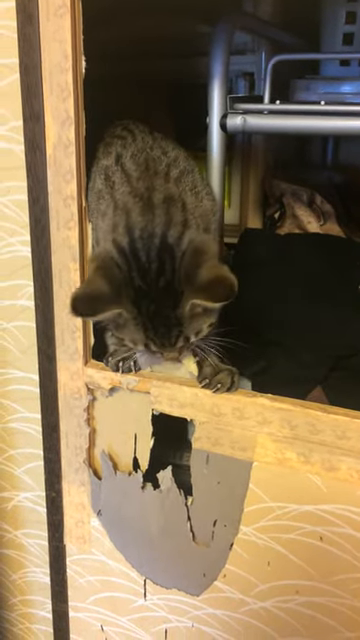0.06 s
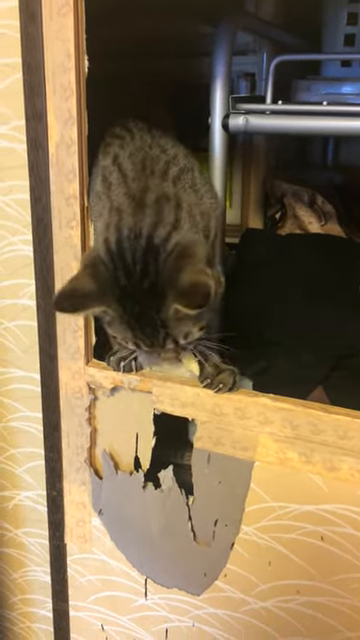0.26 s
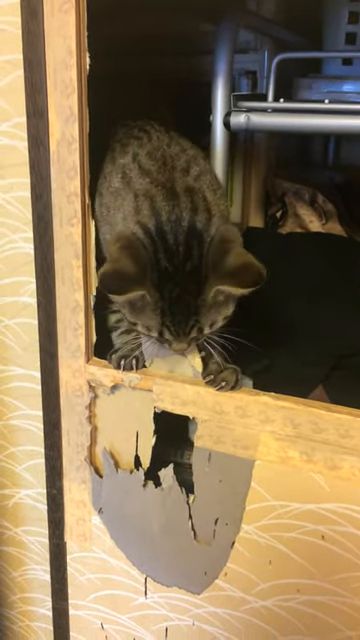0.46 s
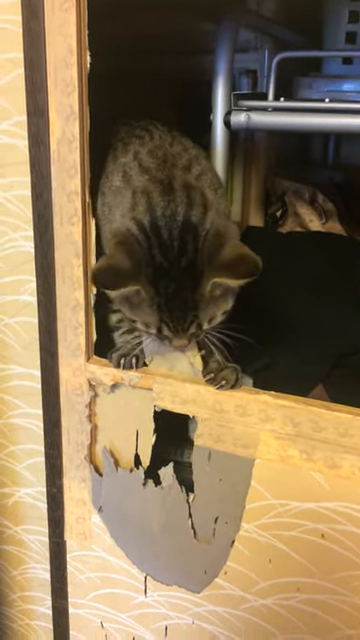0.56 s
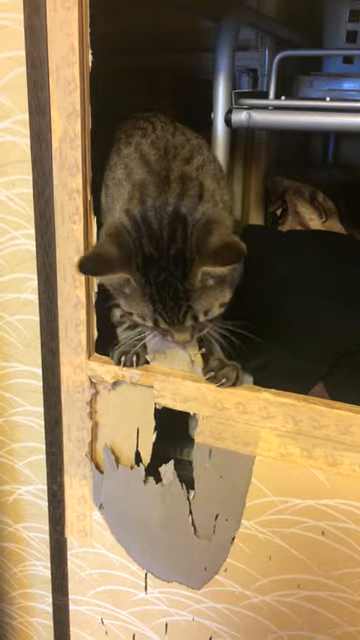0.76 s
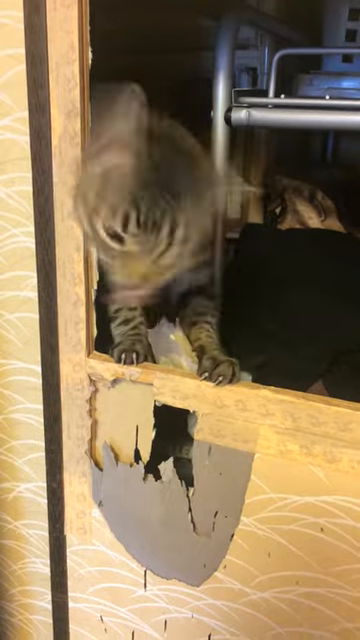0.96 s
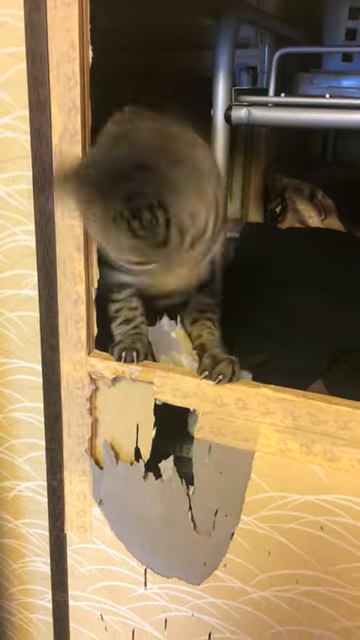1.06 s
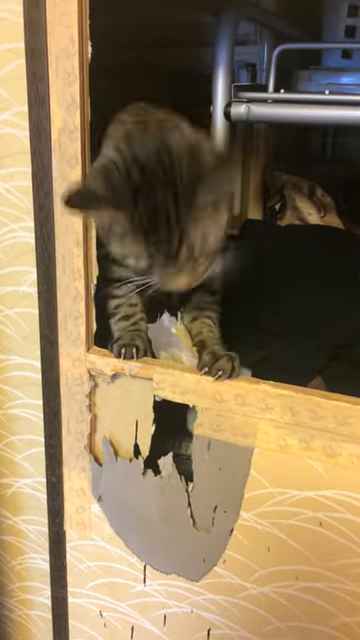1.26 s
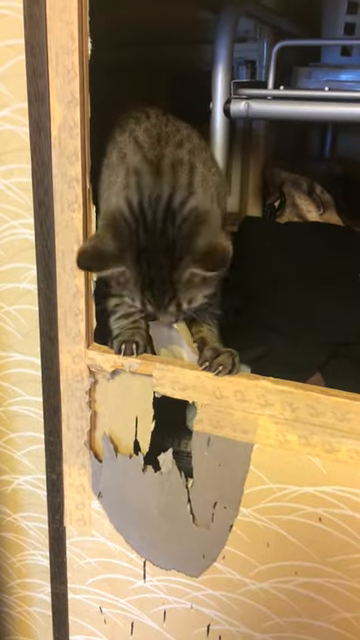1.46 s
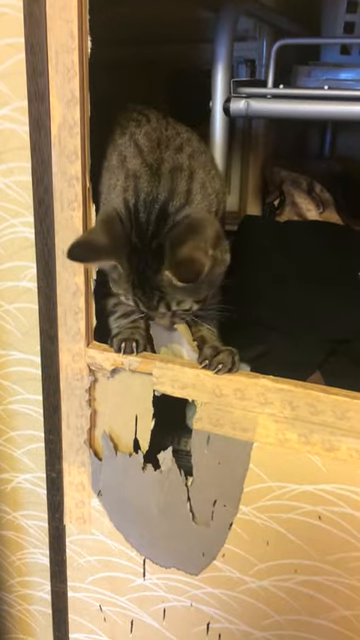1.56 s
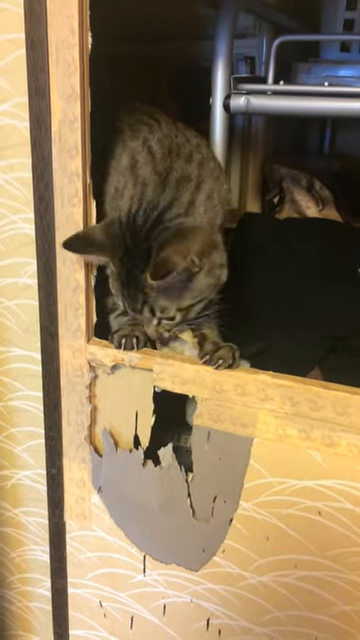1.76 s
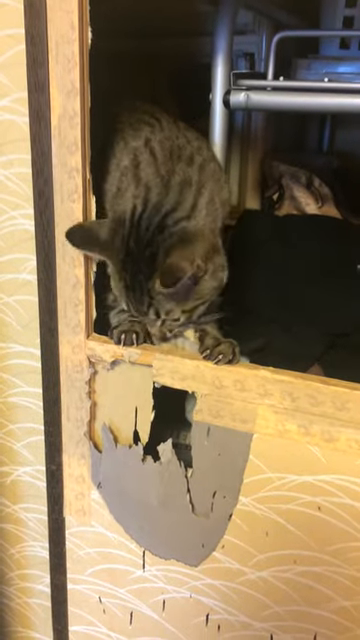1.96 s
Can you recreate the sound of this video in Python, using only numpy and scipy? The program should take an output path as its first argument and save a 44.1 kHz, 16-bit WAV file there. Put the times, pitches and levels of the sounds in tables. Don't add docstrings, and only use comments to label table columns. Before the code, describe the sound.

Paper ripping: three short crackling tugs by a cat, each ending in a sharp snap, the last among the hardest, then faint wooden knocks and dull paw thumps in a quiet room, heard close on a phone microphone.

```python
import sys
import numpy as np
from scipy import signal
from scipy.fft import rfft, irfft
from scipy.io import wavfile

SR = 44100
rng = np.random.default_rng(int(sys.argv[2]) if len(sys.argv) > 2 else 0)


def put_to_file(sound):
    columns = np.atleast_2d(sound).T
    safe = np.clip(columns, -1, 1)
    whole_steps = np.round(safe * 32767)
    wavfile.write(sys.argv[1], SR, whole_steps.astype(np.int16))


def attenuation_scalar(level_db):
    decades = np.asarray(level_db, float) / 20
    return 10 ** decades


N = 88200

SNAP_MS, SNAP_OCTAVES = 0.89, 0.25


def in_time(rows):
    s, *columns = np.transpose(rows)
    return [np.interp(np.arange(N) / SR, s, c) for c in columns]


def at_hz(points, hz):
    point_hz, point_db = np.array(points)[:, :2].T
    return np.interp(np.log(hz), np.log(point_hz), point_db)


def rms_one(x):
    return x / np.sqrt(np.mean(x ** 2) + 1e-20)


def band(x, lo_hz, hi_hz):
    sos = signal.butter(2, [lo_hz, min(hi_hz, 20000)], "band", fs=SR, output="sos")
    return signal.sosfilt(sos, x)


def drift(rate):
    r = np.exp(-2 * np.pi * rate / SR)
    noise = rng.standard_normal(2 * N)
    return rms_one(signal.lfilter([1], [1, -2 * r, r * r], noise)[N:])


def ring(clicks, hz, t60):
    r, w = attenuation_scalar(-60 / (t60 * SR)), 2 * np.pi * hz / SR
    return signal.lfilter([0, np.sin(w)], [1, -2 * r * np.cos(w), r * r], clicks + 1e-18)


def coloured(spectrum):
    hz = np.maximum(np.arange(N // 2 + 1) * SR / N, 10)
    return rms_one(irfft(rfft(rng.standard_normal(N)) * attenuation_scalar(at_hz(spectrum, hz)), N))


def add(out, s, x):
    i = int(s * SR)
    out[i:i + len(x)] += x[:N - i]


def tearing():
    # time in seconds, level in dB, body against hiss in dB.
    tugs = [
        [(0, -64.5, -5), (.1, -59, -12.5), (.15, -54.5, -20.5), (.185, -65, -3), (.209, -58.5, 5.5),
         (.216, -41, 5.5), (.262, -63.5, -2), (.282, -44.5, -13), (.315, -72, -13.5)],
        [(.365, -73, -2), (.375, -60, -4.5), (.415, -59.5, -2), (.455, -49, -4), (.575, -57, -3.5),
         (.61, -58, -6.5), (.655, -52, -10.5), (.695, -41.5, 5), (.725, -89, 17.5)],
        [(.77, -63.5, -23), (.78, -58.5, -20.5), (.84, -77.5, -17), (.863, -60.5, -5.5), (.866, -47, -12),
         (.886, -37.5, -5.5), (.904, -36.5, 1.5), (.922, -49, -4), (.958, -68.5, 10)],
    ]
    # time in seconds, extra top hiss in dB.
    dryness = [(0, 7.5), (.19, 5), (.225, -6), (.29, 12), (.5, 2.5), (.7, -5.5), (.88, 1.5), (.92, 3.5)]
    # frequency in Hz, level in dB per Hz.
    paper = [(500, -18), (900, -7), (1500, -0.5), (2600, -1.5), (3900, 5), (6500, -3), (9500, -2),
             (15000, -7)]
    fibres_per_s, body_top_hz, dry_from_hz = 20000, 2200, 16000
    tug_rows = [row for tug in tugs for row in tug]
    db, body_db = in_time(tug_rows + [(0.93, -82.5, 0.0049)])
    dry_db, = in_time(dryness)

    fibre_db = 3.0 * np.minimum(rng.exponential(1, N), 5)
    clump_db = 1.8 * drift(170)
    sizes = attenuation_scalar(fibre_db + clump_db) * rng.choice([-1, 1], N)
    clicks = sizes * (rng.random(N) < fibres_per_s / SR)
    dealt = rng.integers(0, 24, N)

    body, hiss = np.zeros(N), np.zeros(N)
    for k, hz in enumerate(np.geomspace(600, 15000, 24)):
        ringing = ring(clicks * (dealt == k), hz, 9.0 / hz)
        patch_db = 2.5 * drift(62)
        part = attenuation_scalar(at_hz(paper, hz) + patch_db) * hz * ringing
        part = part * attenuation_scalar(dry_db / (1 + (dry_from_hz / hz) ** 4))
        share = 1 / (1 + (hz / body_top_hz) ** 4)
        body += share * part
        hiss += (1 - share) * part
    return attenuation_scalar(db) * (rms_one(hiss) + attenuation_scalar(body_db) * rms_one(body))


def snap(db, hz, bright_db, ms, octaves):
    # frequency in Hz, level in dB per flap mode.
    crack_spectrum = [(600, -15), (1100, -9), (3000, -1.5), (8500, -0.5), (14000, -21)]
    t, out = np.arange(900) / SR, 0
    half_octave = np.sqrt(2)
    for mode_hz in np.geomspace(600, 14500, 22):
        burst = rng.standard_normal(len(t)) * np.exp(-1000 * t / ms)
        near_pitch = np.exp(-(np.log2(mode_hz / hz) / octaves) ** 2)
        share = near_pitch + attenuation_scalar(bright_db + at_hz(crack_spectrum, mode_hz))
        mode = ring(burst, mode_hz, 5.5 / mode_hz + .001)
        out = out + share * rms_one(band(mode, mode_hz / half_octave, half_octave * mode_hz))
    own_mode = band(ring(burst, hz, .006), hz / half_octave, half_octave * hz)
    out = out + attenuation_scalar(4) * rms_one(own_mode)
    return attenuation_scalar(db) * out / abs(out).max()


def snaps():
    # start in seconds, peak in dB, flap pitch in Hz, bright crack in dB, burst decay in ms.
    big_snaps = [
        (.2124, -22, 2100, -2, .28),
        (.2770, -27, 5200, 0, 1.6),
        (.6752, -27, 2400, 0, 1.1),
        (.689, -26, 1480, -6, .4),
        (.901, -20, 2600, 3, .28),
    ]
    # start in seconds, peak in dB, flap pitch in Hz, bright crack in dB.
    small_snaps = [(0.0398, -46.5, 2100, -23), (0.0494, -50, 1900, -11), (.057, -42.5, 3600, 2),
                   (.068, -37, 4200, 13), (.0845, -46, 4050, -16), (.112, -46, 10100, -34),
                   (0.118, -35.5, 9350, -30), (0.13, -36.5, 9400, -15), (.143, -36, 9250, -12),
                   (.147, -38.5, 4040, -19), (.179, -45, 7350, -2), (.1945, -36, 8600, -18),
                   (.201, -31.5, 7850, 2), (0.373, -39.5, 3400, -7), (0.458, -30.5, 4200, -3),
                   (.4595, -35.5, 9400, -23), (.6405, -34.5, 3170, -7), (.646, -37, 7700, -22),
                   (.747, -49, 5030, 28), (.774, -40, 4100, -16), (0.849, -42, 4400, 3),
                   (0.865, -43.5, 8500, 3.5)]
    # start in seconds, peak in dB, pitch in Hz.
    pops = [
        (.462, -35.5, 1900),
        (.473, -39, 846),
        (.489, -36, 813),
        (.682, -29.5, 1470),
        (0.896, -35, 1390),
    ]
    out = np.zeros(N)
    for s, db, hz, bright_db, ms in big_snaps:
        add(out, s, snap(db, hz, bright_db, ms, SNAP_OCTAVES))
    for s, db, hz, bright_db in small_snaps:
        add(out, s, snap(db, hz, bright_db, SNAP_MS, SNAP_OCTAVES))
    for s, db, hz in pops:
        add(out, s, snap(db, hz, -13.5, 2 * SNAP_MS, .2))
    return out


def breaks():
    # start in seconds, peak in dB.
    blows = [
        (.21265, -5),
        (0.9, -4),
        (.2766, -22.5),
        (.6763, -19),
        (.6891, -13),
    ]
    # frequency in Hz, level in dB, t60 in seconds.
    flaps = [
        [(650, -15, 0.01), (1113, -5, .009), (1864, 0.5, .005), (2600, 0.5, 0.0035), (3800, -1, .004),
         (5900, -7.5, .004), (7170, -11.5, .004), (9000, -8.5, .004), (13000, -22.5, .003)],
        [(450, -12.5, .01), (760, -8, .009), (1300, -9, 0.011), (2450, -1, .006), (4200, 1.5, .004),
         (5800, -1, .003), (8000, 3, 0.003), (10500, -7, .003), (12700, -12.5, .003)],
        [(1296, -0.5, .03), (1900, -1.5, 0.0084), (3340, -6.5, 0.0088), (4500, 1, 0.0095), (6200, -8, 0.0096),
         (9400, -1, 0.0068), (13330, -3, 0.01)],
        [(750, -13, .012), (1300, -2.5, .012), (2500, -6.5, .007)],
        [(650, -16, 0.009), (1050, -6.5, .008), (1500, 1, .007), (2100, -7.5, 0.0047)],
    ]
    # start in seconds, peak in dB, pitch in Hz, bright crack in dB.
    ticks = [(.668, -39, 1470, -30), (.694, -37, 1500, -22), (.697, -35, 1610, -4), (0.698, -37, 4500, -13),
             (0.8813, -24, 3480, -2), (0.884, -25, 2790, -18), (0.8878, -22, 4200, 2),
             (0.8932, -21, 1900, 5), (0.908, -44, 2370, -10), (.9195, -38.5, 3000, -2),
             (1.1719, -40.5, 1650, -23), (1.2195, -50, 1900, -13), (1.276, -62.5, 3000, -10),
             (1.358, -56, 2870, -17), (1.371, -53.5, 1785, -19), (.094, -45, 9000, -16),
             (0.124, -44, 9600, -18), (.153, -45, 9500, -1), (.380, -43, 3800, -3), (.407, -44, 3900, -12),
             (0.451, -41, 1110, -15), (0.496, -44, 1900, -5), (.562, -42.5, 1500, -3)]
    flap_low_hz = 300
    out, blow = np.zeros(N), np.arange(900) == 0
    for (s, db), modes in zip(blows, flaps):
        x = 0
        for k, (hz, mode_db, t60) in enumerate(modes):
            x = x + (-1) ** k * attenuation_scalar(mode_db) * ring(blow, hz, t60)
        x = band(band(x, flap_low_hz, SR / 2), flap_low_hz, SR / 2)
        add(out, s, attenuation_scalar(db) * x / abs(x).max())
    for s, db, hz, bright_db in ticks:
        add(out, s, snap(db, hz, bright_db, SNAP_MS, SNAP_OCTAVES))
    return out


def knocks():
    # start in seconds, peak in dB, favoured pitch in Hz, scuff brightness in dB, rattle in ms.
    frame_knocks = [(0.966, -49.5, 978, -29, 18), (1.056, -54, 942, -15, 7.0), (1.096, -51, 603, -10.5, 8),
                    (1.171, -40.5, 1560, -9.5, 17.4), (1.224, -38.5, 985, -15.5, 6.0),
                    (1.243, -44.5, 760, -15, 14.2), (1.317, -54.5, 999, -12.5, 11),
                    (1.362, -45, 980, -15, 12), (1.439, -57.5, 538, -29, 30), (1.492, -51, 937, -22, 7.0),
                    (1.564, -58.5, 455, -11, 15.0), (1.732, -59.5, 523, -4.5, 17.8)]
    # frequency in Hz, level in dB, t60 in seconds.
    frame = [(332.6, -19, 0.032), (584, 5.5, 0.056), (764, 0.5, 0.068), (980, 17, 0.012), (1293, 3, 0.032),
             (1526, 5.5, 0.012), (1870, -9, 0.041), (2480, -20.5, 0.016)]
    favour_db_per_octave = 14.5
    out, t = np.zeros(N), np.arange(6000) / SR
    for s, db, pitch_hz, bright_db, ms in frame_knocks:
        push = rng.standard_normal(len(t)) * np.exp(-1000 * t / ms)
        body = 0
        for hz, mode_db, t60 in frame:
            distance = abs(np.log2(hz / pitch_hz))
            body = body + attenuation_scalar(mode_db - favour_db_per_octave * distance) * ring(push, hz, min(t60, .07))
        scuff = band(band(push, 850, 2200), 450, 3700)
        add(out, s, attenuation_scalar(db) * (body / abs(body).max() + attenuation_scalar(bright_db) * scuff / abs(scuff).max()))
    return out


def panel():
    # time in seconds, level in dB, upper modes against lower in dB.
    load = [(0.0, -74.5, 5), (0.13, -57.5, -7), (0.24, -72.5, 5.5), (0.64, -71, 8.5), (0.72, -54.5, 6),
            (0.84, -66.5, -5), (0.9, -56, 6.5), (1.03, -56, 4.5), (1.17, -62.5, 2.5), (1.23, -51, 1),
            (1.3, -61, 3), (1.38, -53.5, 0), (1.58, -57, 2.5), (1.64, -54.5, -9), (1.68, -59.5, 1),
            (1.73, -50, -10), (1.96, -59, -4), (2.0, -62, 3.5)]
    # frequency in Hz, level in dB, t60 in seconds.
    panel_modes = [(51.5, -28, .15), (74, 1, 0.55), (122, -3.5, 0.11), (152.5, -1.5, .15), (201, -3, 0.051),
                   (335, -10.5, 0.039)]
    pushes_per_s = 250
    db, upper_db = in_time(load)
    pushes = rng.standard_normal((2, N)) * (rng.random((2, N)) < pushes_per_s / SR)
    out = 0
    for k, (hz, mode_db, t60) in enumerate(panel_modes):
        level = attenuation_scalar(mode_db + upper_db * (hz > 90))
        out = out + level * rms_one(ring(pushes[k % 2], hz, t60))
    return attenuation_scalar(db - 4) * band(band(out, 27, 440), 33, 750)


def thumps():
    # start in seconds, peak in dB, pitch in Hz.
    landings = [(0.622, -50.5, 158), (0.69, -46, 74), (0.706, -52, 133), (0.909, -57, 137.7),
                (0.966, -37, 149.6), (0.986, -52, 156.6), (1.212, -43.5, 108), (1.273, -49, 98),
                (1.325, -46, 74), (1.373, -43, 74), (1.469, -43, 74), (1.574, -48, 216.5),
                (1.59, -47.5, 74), (1.796, -48, 74), (1.927, -49.5, 74)]
    rise_s = .013
    out, t = np.zeros(N), np.arange(8000) / SR
    swell = (t / rise_s * np.exp(1 - t / rise_s)) ** 2
    for s, db, hz in landings:
        add(out, s, attenuation_scalar(db) * swell * np.sin(2 * np.pi * hz * t))
    return out


def brushing():
    # start in seconds, length in seconds, level in dB, centre in Hz, width in octaves.
    brushes = [
        (0.109, 0.13, -64, 9400, 0.27),
        (1.704, 0.16, -73, 9000, 1.23),
        (1.901, 0.098, -72.5, 8000, 1.3),
        (1.919, 0.047, -69.5, 2907, 0.39),
        (1.992, 0.014, -68.5, 3000, 1.4),
    ]
    t, out = np.arange(N) / SR, 0
    for s, length, db, hz, octaves in brushes:
        swell = np.clip(2.5 * np.minimum(t - s, s + length - t) / length, 0, 1)
        level = attenuation_scalar(db + 2.0 * drift(100)) * swell
        half_width = 2 ** (octaves / 2)
        out = out + level * rms_one(band(rng.standard_normal(N), hz / half_width, hz * half_width))
    return out


def room(x):
    # frequency in Hz, t60 in seconds.
    decay = [(300, .15), (1000, 0.05), (3000, 0.15), (9000, .07)]
    room_db, gap_s = -21.5, 0.0036
    t, edges = np.arange(SR // 3) / SR, 150 * 2.0 ** np.arange(8)
    tail = 0
    for lo, hi in zip(edges, edges[1:]):
        fall = attenuation_scalar(-60 * t / at_hz(decay, np.sqrt(lo * hi)))
        tail = tail + band(rng.standard_normal(len(t)), lo, hi) * fall
    tail = tail * np.clip(t / gap_s - 1, 0, 1)
    return attenuation_scalar(room_db) * signal.fftconvolve(x, tail / np.sqrt(np.sum(tail ** 2)))[:N]


def room_tone():
    # frequency in Hz, level in dB per Hz.
    tone_spectrum = [(88, -28), (150, -8), (391, -13.5), (745, -12), (871, -17.5), (1720, -18), (2180, -30),
                     (14500, -36.5), (16000, -40.5)]
    return attenuation_scalar(-69 + 0.61 * drift(13)) * band(coloured(tone_spectrum), 64, 22000)


def scene():
    near = snaps() + tearing() + breaks() + knocks()
    return (near + room(near) + panel() + thumps() + brushing() + room_tone())[None]


def band_limit(x):
    return signal.sosfilt(signal.butter(12, 16470, fs=SR, output="sos"), x)


def record(dry):
    low_pass = signal.cheby2(10, 25, 15400, fs=SR, output="sos")
    mix = signal.sosfilt(low_pass, dry)
    return band_limit(mix)


dry = scene()
out = record(dry)
put_to_file(out)
```